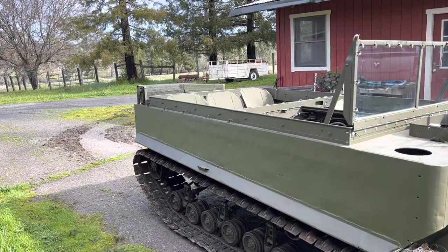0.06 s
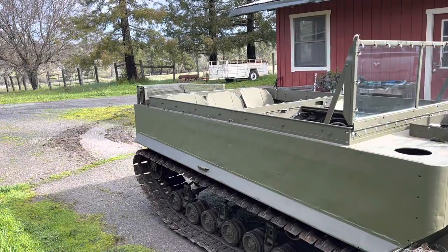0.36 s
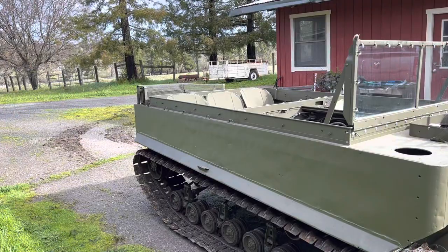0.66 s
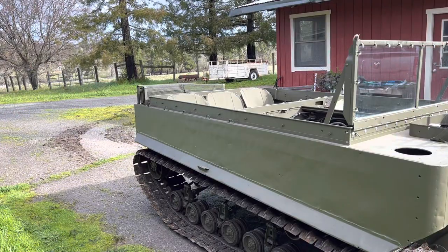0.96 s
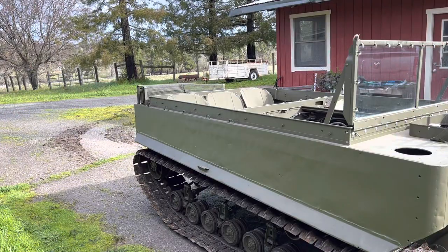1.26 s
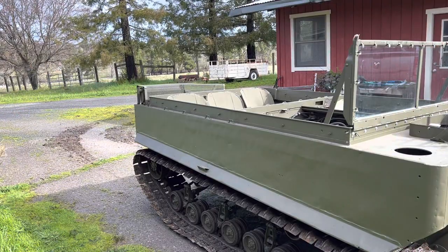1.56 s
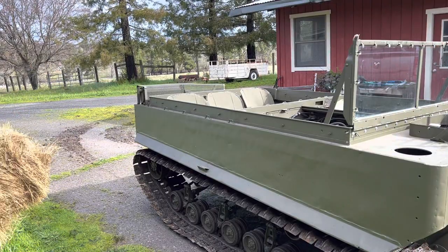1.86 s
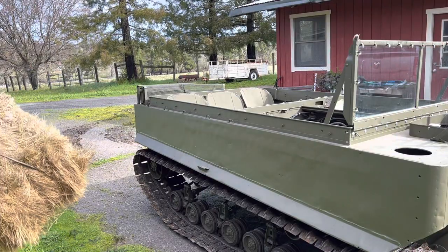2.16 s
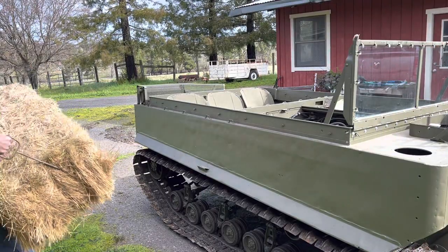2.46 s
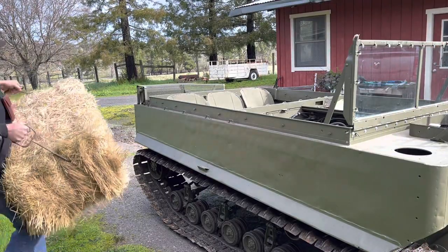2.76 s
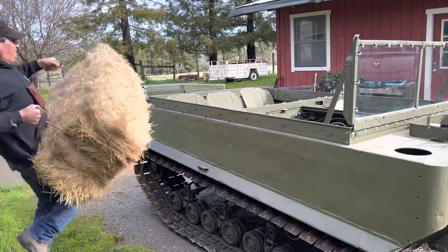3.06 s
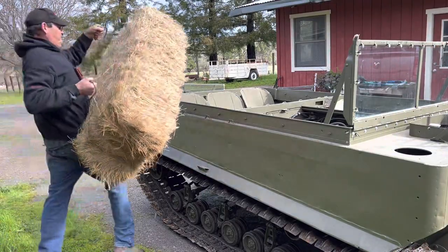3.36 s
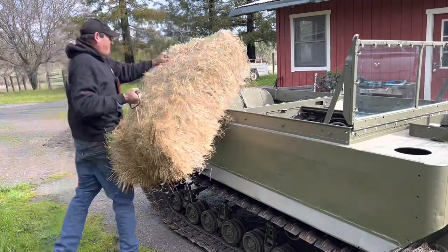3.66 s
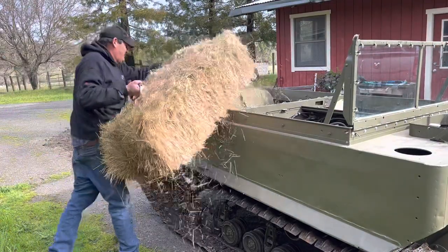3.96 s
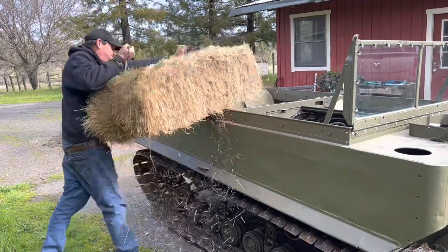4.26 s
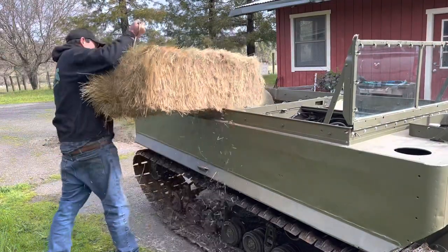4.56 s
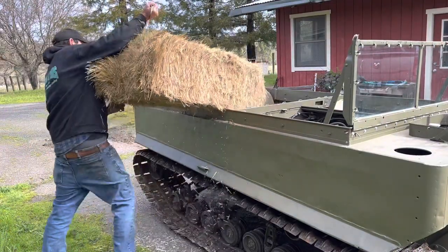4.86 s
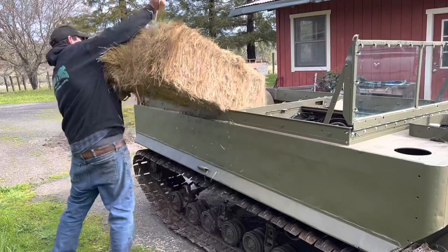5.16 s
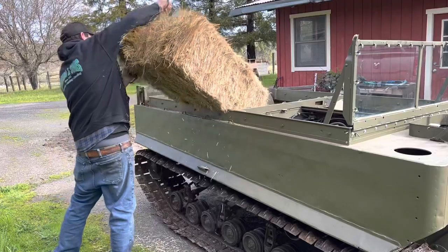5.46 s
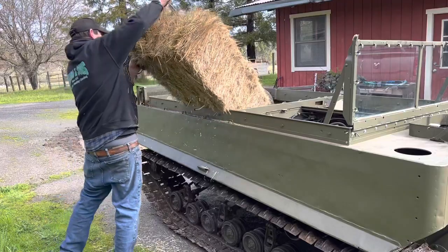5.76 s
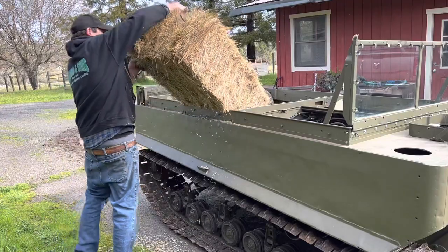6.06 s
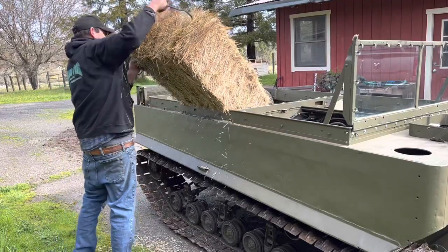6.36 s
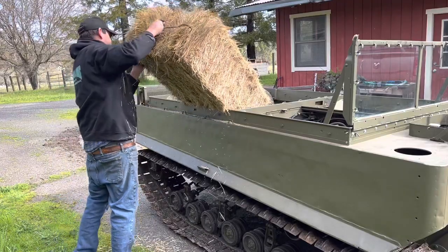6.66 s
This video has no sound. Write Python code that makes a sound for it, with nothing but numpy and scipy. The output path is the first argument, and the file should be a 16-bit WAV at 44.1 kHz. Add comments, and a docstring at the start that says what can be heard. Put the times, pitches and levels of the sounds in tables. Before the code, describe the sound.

A low, lumpy engine idle runs throughout, with a whirring fan and irregular knocks, each followed by an exhaust boom. Over it a hook clinks once and dry hay hisses and crackles in heaves, with a few heavy footfalls. The bale then hits the vehicle's steel side with a hollow thud, scrapes along it and goes on stirring softly. The microphone is a few metres off in an open yard.

```python
"""A farmyard, a phone microphone a few metres from a parked tracked carrier that idles lumpily.
From the start the engine races, stumbles and slows; each hard firing knocks, then booms out of the pipe.
Almost at once a steel hook clinks and a hay bale is picked up; it rustles, stalks snap and boots thump.
About three and a half seconds in, the bale bumps the steel hull and scrapes as it is shoved over
the side. The hay stirs on to the end over the hunting engine."""
import sys
import numpy as np
from scipy import signal
from scipy.fft import rfft, irfft
from scipy.io import wavfile
from scipy.ndimage import uniform_filter1d

SR = 44100
rng = np.random.default_rng(int(sys.argv[2]) if len(sys.argv) > 2 else 0)


def output_pcm(signal):
    """Save a mono or channel-first signal as 16-bit PCM at the path in sys.argv[1].

    Samples are clipped to [-1, 1] before scaling.
    """
    pcm = np.clip(np.atleast_2d(signal).T, -1, 1) * 32767
    wavfile.write(sys.argv[1], SR, np.round(pcm).astype(np.int16))


N = 305613
T = np.arange(N) / SR
FREQS = np.fft.rfftfreq(N, 1 / SR)
TAP_AGE = T[:8192]
TAP_FREQS = np.fft.rfftfreq(len(TAP_AGE), 1 / SR)

# The hunting idle. Each row: time in seconds, nominal firings a second, relative exhaust level in dB.
HUNTING_IDLE = [(0, 37, -36), (0.3, 32.84, -30.5), (0.45, 37.69, -32.5), (0.76, 35.55, -33.5),
                (0.88, 33.3, -28.5), (1.0, 31.9, -32.5), (1.12, 34.77, -26.5), (1.29, 39.06, -35),
                (1.4, 34.28, -38), (1.57, 36.57, -30), (1.72, 38.2, -33), (1.95, 37.2, -36),
                (2.07, 35.95, -28.5), (2.18, 32.2, -34), (2.36, 35.74, -26.5), (2.55, 38.06, -34.5),
                (2.87, 35.8, -31.5), (3.1, 38.3, -34.5), (3.38, 37.2, -33), (3.55, 37.6, -33.5),
                (3.95, 36.93, -30), (4.22, 39.2, -37.5), (4.42, 36.75, -29), (4.55, 38.27, -36),
                (4.95, 35.22, -28.5), (5.17, 38.95, -33.5), (5.4, 36.1, -30), (5.52, 37, -30.5),
                (5.63, 40.1, -33.5), (5.85, 36.1, -30.5), (6.0, 38.17, -36.5), (6.24, 36.74, -29.5),
                (6.38, 38.56, -35), (6.55, 35, -29.5), (6.93, 36, -32)]
# Hard firings, each a stumble of the engine. Each row: time in seconds, relative knock and ring levels
# in dB, ring pitch in Hz, relative crack level in dB.
HARD_FIRINGS = [(0.145, -37, -41, 3180, -59), (0.2563, -35.5, -46, 3300, -52),
                (0.66, -36.5, -40, 3270, -47), (0.795, -42, -40, 3000, -45),
                (0.9208, -44.5, -45.5, 2890, -61), (1.3435, -43, -39.5, 3170, -50),
                (1.7558, -36.5, -44.5, 3160, -57), (1.97, -40.5, -44, 2860, -47),
                (2.0533, -39, -49, 2790, -49), (2.615, -37, -44, 3230, -45), (2.671, -42, -48, 3280, -52),
                (2.7564, -41, -42, 2950, -46.5), (3.163, -38.5, -47.5, 3230, -63),
                (3.245, -44, -42.5, 3250, -59), (3.488, -55, -42, 3180, -57), (3.6263, -43, -51, 2840, -61),
                (3.765, -52, -46, 2730, -49.5), (3.906, -42.5, -49, 2800, -57),
                (4.2796, -42, -45, 2800, -50), (4.575, -43.5, -52, 3350, -54), (4.792, -45, -49, 3000, -55),
                (4.872, -41, -52, 3220, -61), (5.2849, -42, -42, 2900, -47), (5.363, -42, -47, 2800, -51),
                (5.6682, -43, -45, 3290, -47), (5.7779, -40.5, -52, 2820, -49),
                (6.019, -44, -47.5, 2580, -50), (6.0767, -44.5, -48, 2850, -49),
                (6.433, -42, -44, 3120, -50), (6.5404, -44, -46.5, 2880, -48),
                (6.6816, -46, -40.5, 2870, -49), (6.9082, -47, -41.5, 3190, -50)]


def undb(db):
    """Decibels to gain."""
    return 10 ** (np.asarray(db) / 20)


def unit(x):
    """Scale to rms 1."""
    return x / np.sqrt(np.mean(x ** 2))


def curve(rows):
    """Points in time joined into a value at every sample."""
    return np.interp(T, *np.transpose(rows))


def spectrum(rows):
    """Points joined on a log-frequency axis."""
    hz, value = np.transpose(rows)
    return np.interp(np.log(FREQS + 1), np.log(hz), value)


def band(hz, width_hz, freqs=FREQS):
    """Response of one resonance, gain 1 at its centre."""
    return 1j * freqs * width_hz / (hz ** 2 - freqs ** 2 + 1j * freqs * width_hz)


def modes(rows, freqs=FREQS):
    """Response of a body with several resonances."""
    return sum(undb(db) * band(hz, width, freqs) for hz, width, db in rows)


def shape(x, response):
    """Filter by a frequency response."""
    return irfft(rfft(x) * response, N)


def noise():
    """White noise."""
    return rng.standard_normal(N)


def walk(rate, spread=2.9):
    """A random wander about zero that turns `rate` times a second."""
    knots = rng.standard_normal(2048)
    return spread * np.interp(T * rate, np.arange(len(knots)), knots)


def swell(delay_s, spread_s):
    """A smooth hump at the same delay from every hard firing."""
    marks = np.zeros(N + SR)
    marks[[int((row[0] + delay_s) * SR) for row in HARD_FIRINGS]] = 1
    lag = np.arange(-(SR // 2), SR // 2 + 1) / SR
    return signal.fftconvolve(marks, np.exp(-.5 * (lag / spread_s) ** 2), "same")[:N]


def bursts(times, sizes, decay_s):
    """Envelope of sudden starts that die away."""
    out = np.zeros(N)
    for s, size in zip(times, sizes):
        start = int(s * SR)
        age = T[:min(N - start, int(10 * decay_s * SR))]
        out[start:start + len(age)] += size * np.exp(-age / decay_s)
    return out


def strokes(rows, attack_s=0.053, release_s=0.03):
    """Envelope of rubbing movements: each rises towards its level and dies away after its length."""
    out = np.zeros(N)
    for s, length, db in rows:
        start = int(s * SR)
        age = T[:min(SR, N - start)]
        rise = np.minimum(age / attack_s, 1)
        fall = np.exp(-np.maximum(age - length, 0) / release_s)
        out[start:start + len(age)] += undb(db) * rise * fall
    return out


def tap(s, db, decay_s, response, rise_s):
    """One short, rough contact, coloured by what it strikes."""
    force = np.exp(-abs(TAP_AGE - rise_s) / decay_s) * np.minimum(TAP_AGE / rise_s, 1)
    sound = irfft(rfft(force * rng.standard_normal(len(force))) * response)
    out, start = np.zeros(N + SR), max(0, int(s * SR))
    out[start:start + len(force)] = undb(db) * unit(sound) * np.sqrt(np.mean(force ** 2))
    return out[:N]


def ring(rows, at_s, rise_s):
    """A struck body: every mode starts at the blow and dies away."""
    age = np.maximum(T - at_s, 0)
    ringing = sum(undb(db - 60 * age / t60) * np.sin(2 * np.pi * hz * age) for hz, t60, db in rows)
    return -np.expm1(-age / rise_s) * ringing


def crank():
    """Firings counted since the start, nudged so that every hard firing falls on a beat."""
    count = np.cumsum(curve(np.array(HUNTING_IDLE)[:, :2])) / SR
    times = np.array(HARD_FIRINGS)[:, 0]
    at_hard = np.interp(times, T, count)
    beats = np.cumsum(np.maximum(1, np.round(np.diff(at_hard, prepend=0))))
    return count + np.interp(T, times, beats - at_hard)


def overtones(beat, drift, drift_rate):
    """The 7th to 12th multiples of the firing rate, each drifting in phase."""
    return sum(np.cos(2 * np.pi * order * beat + drift * walk(drift_rate)) for order in range(7, 13))


def exhaust(beat, gas_db=-26, trim_db=-2, wobble=.22, roughness=.34):
    """The pipe favours twice the firing rate; its note falters at each stumble and gas puffs each beat."""
    # The pipe's tone. Each row: multiple of the firing rate, relative level in dB.
    harmonics = [(1, -20), (2, 7), (3, -11.5), (4, -14), (5, -34), (6, -22.5), (7, -31.5), (8, -28.5),
                 (9, -37), (10, -28.5), (11, -43.5), (12, -30.5), (14, -37)]
    # In a stumble the note falters, drops out again, kicks, then sags slightly.
    # Each row: delay from the knock in seconds, spread in seconds, level change in dB.
    stumble = [(-.006, 0.0033, -9.5), (0.056, 0.027, -6.5), (0.092, 0.0064, 5), (.16, 0.073, -1)]
    # Lone firings that drop out or kick. Each row: time in seconds, level change in dB.
    lurches = [(.59, -8), (.835, 4), (0.989, -9), (1.262, -8), (1.325, -9), (1.41, 21), (1.464, -6),
               (1.735, -11), (1.84, -5), (2.27, 6), (2.42, -9), (2.498, -19), (3.122, -6), (4.24, -7),
               (4.326, 10.5), (4.365, -9), (4.47, 2), (4.665, 4), (4.704, -11), (5.19, -11), (5.98, -2.5),
               (6.402, -9), (6.535, 7), (6.76, -2)]
    stumble_db = sum(db * swell(delay, spread) for delay, spread, db in stumble)
    lurch_db = sum(db * np.exp(-.5 * ((T - s) / .015) ** 2) for s, db in lurches)
    flow = undb(curve(np.array(HUNTING_IDLE)[:, ::2]) + trim_db)
    strength = undb(stumble_db + lurch_db + walk(36))
    # no two firings push the crank equally hard
    unrest = np.clip(swell(delay_s=.04, spread_s=.06), .35, 1)
    jolt = wobble * unrest * walk(36)
    tone = 0
    for order, db in harmonics:
        # away from the pipe's resonance every firing differs, most of all in a stumble
        scatter = 0 if order == 2 else roughness * unrest
        size = undb(db) * (1 + scatter * walk(22))
        tone = tone + size * np.cos(2 * np.pi * order * beat + jolt + scatter * walk(14))
    puffs = 1 + 0.075 * np.cos(2 * np.pi * (beat - .8))
    gas = puffs * unit(shape(noise(), band(hz=204, width_hz=450) ** 2))
    return flow * (np.sqrt(2) * strength * tone + undb(gas_db) * gas)


def growl(beat, breath_db=-7, lumpiness=1.1, puff_depth=.7):
    """Uneven firings drive the silencer's throat: overtones glide through it and gas puffs each beat."""
    # The throat's resonances. Each row: centre in Hz, width in Hz, relative gain in dB.
    throat_modes = [(302.3, 42, 2.5), (383, 40, -2.5)]
    # The growl's course. Each row: time in seconds, level in dB.
    levels = [(0, -47), (1.3, -49.5), (2.4, -49), (3.0, -49.5), (3.4, -60.5), (6.93, -49.5)]
    drive = overtones(beat, drift=.6, drift_rate=12)
    gas = noise() * (1 + puff_depth * np.cos(2 * np.pi * beat))
    throat = modes(throat_modes)
    voice = unit(shape(drive, throat)) + undb(breath_db) * unit(shape(gas, throat ** 2))
    return undb(curve(levels)) * unit(voice * undb(lumpiness * walk(30)))


def machinery(beat, whirr_db=-39.5, throb=0.025, flicker=0.56, cover_db=-53, shake_db=-7):
    """Fan and valve gear whirr in step with the crank; the cover hums as overtones glide through it."""
    # The colour of fan and valve gear. Each row: frequency in Hz, relative density in dB.
    whirr_colour = [(30, -11), (50, 3), (110, 9), (145, 1), (220, 0), (300, -7), (345, -11), (450, -6.5),
                    (700, -12.5), (1300, -17.5), (2100, -21), (3100, -24), (3900, -34.5), (5500, -40.5),
                    (15000, -45)]
    # The engine cover's resonances. Each row: centre in Hz, width in Hz, relative gain in dB.
    cover_modes = [(306.6, 19, -3.5), (371, 19.4, 0), (803, 10, -6.5), (1042, 40, -7), (2766, 26, -13.5)]
    pulse = (1 + throb * np.cos(2 * np.pi * beat)) * undb(flicker * walk(22))
    whirr = unit(shape(noise() * pulse, undb(spectrum(whirr_colour))))
    shaking = overtones(beat, drift=.5, drift_rate=10)
    cover = modes(cover_modes)
    hum = unit(shape(noise(), cover)) + undb(shake_db) * unit(shape(shaking, cover))
    return undb(whirr_db) * whirr + undb(cover_db) * hum


def knocks(ring_trim_db=-0.5, ring_width_hz=500, rap_s=.0032, tail_s=0.057):
    """Each knock raps the engine block and rings briefly at its own pitch."""
    # The block's resonances. Each row: centre in Hz, width in Hz, relative gain in dB.
    block_modes = [(1114, 77, 13.5), (1410, 130, 7.5), (1630, 160, 5), (2260, 850, -10.5), (3650, 300, -23)]
    # Further engine knocks, without the bright crack.
    # Each row: time in seconds, relative knock and ring levels in dB, ring pitch in Hz.
    further_knocks = [(0.003, -38.5, -39, 3200), (0.823, -46, -46, 3230), (0.855, -44, -49, 2840),
                      (1.374, -39.5, -45, 2820), (1.996, -47, -45.5, 3370), (2.083, -42, -45, 2860),
                      (2.134, -49, -49, 3330)]
    # The rap, the next firing's softer rap and the hull's short tail.
    # Each row: delay in seconds, relative level in dB, decay in seconds.
    contacts = [(-.0015, 0, rap_s), (.027, -12, rap_s), (0, -17, tail_s)]
    block, out = modes(block_modes, TAP_FREQS), np.zeros(N)
    for s, knock_db, ring_db, hz in [row[:4] for row in HARD_FIRINGS] + further_knocks:
        ringing = band(hz, ring_width_hz, TAP_FREQS) ** 2
        for db, response in (knock_db, block), (ring_db + ring_trim_db, ringing):
            for delay_s, share_db, decay_s in contacts:
                out += tap(s + delay_s, db + share_db, decay_s, response, rise_s=.002)
    return out


def booms(delay_s=0.02604, boom_db=-22, boom_hz=68, spread_s=.0075):
    """The exhaust valve opens just after a hard firing and lets out one heavy swing of pressure."""
    # Further exhaust booms. Each row: time in seconds, level in dB, pitch in Hz.
    further_booms = [(0.026, -18, 63), (0.3668, -20, 72), (0.5556, -16, 71), (0.643, -17.5, 83),
                     (0.88, -35, 67.4), (2.0195, -19.5, 70.5), (2.139, -20, 60.6)]
    out = np.zeros(N)
    for s, db, hz in [(row[0] + delay_s, boom_db, boom_hz) for row in HARD_FIRINGS] + further_booms:
        near = abs(T - s) < 5 * spread_s
        age = T[near] - s
        out[near] += undb(db) * np.sin(2 * np.pi * hz * age) * np.exp(-.5 * (age / spread_s) ** 2)
    return out


def hay(trim_db=2, grain_db=4, unevenness=.65, crackle_db=-5, stalks_per_s=550, split_hz=7800):
    """Countless stalks rub into a hiss that swells with each heave; single ones crackle through it."""
    # The colour of hay. Each row: frequency in Hz, relative density in dB.
    straw_colour = [(500, -10), (2000, -2), (4000, -2), (5600, -2.5), (8000, 4.5), (10000, 5.5),
                    (12000, 1.5), (14000, 0.5), (16000, 0)]
    # Heaves of the bale. Each row: start and length in seconds, relative level in dB, treble tilt in dB.
    heaves = [(0.05, 0.044, -48, -13), (0.486, 0.17, -56.5, -1), (0.973, 0.096, -49, 3),
              (1.104, 0.26, -53, 0), (1.557, 0.24, -47, 0.5), (1.983, 0.23, -60.5, 1),
              (2.182, 0.16, -57, -5), (2.776, 0.091, -51.5, -7), (3.327, 0.14, -53.5, -6),
              (3.506, 0.13, -56, 1), (3.942, 0.34, -61, -3), (4.718, 0.51, -59.5, 1), (6.442, 0.17, -56, 2)]
    # Hay stirring between the heaves. Each row: time in seconds, relative level in dB.
    stirring = [(0, -69), (.9, -65.5), (1.45, -57), (1.95, -64), (2.6, -68), (3.1, -66.5), (3.7, -60),
                (4.5, -63.5), (5.5, -64), (5.88, -67), (6.3, -60.5), (6.93, -61)]
    rub = noise() * undb(grain_db * noise())
    stalks = (rng.random(N) < stalks_per_s / SR) * noise()
    stalks *= undb(4 * np.minimum(rng.exponential(size=N), 4))  # a few stand out, by up to 16 dB
    friction = unit(rub) + undb(crackle_db) * unit(stalks)
    hiss = unit(shape(friction, undb(spectrum(straw_colour))))
    rasp = shape(hiss, 1 / (1 + (FREQS / split_hz) ** 4))
    out = 0
    for part, lean in (rasp, -.5), (hiss - rasp, .5):
        effort = strokes([(s, length, db + lean * tilt_db) for s, length, db, tilt_db in heaves])
        out = out + part * np.hypot(effort, undb(curve(stirring)))
    return out * undb(trim_db + unevenness * walk(29))


def hook(at_s=0.0962, drag_s=.032, clink_gain_db=2.5):
    """The steel hook drags with a swelling scrape and clinks once as the bale is picked up."""
    # The hook's modes. Each row: pitch in Hz, seconds to fall 60 dB, relative level in dB.
    hook_modes = [(1900, 0.018, -44), (1980, 0.047, -38), (2220, 0.11, -43.5), (2460, 0.042, -41),
                  (2920, 0.026, -40), (5090, 0.027, -39.5), (5730, .05, -53), (6160, 0.054, -56),
                  (6960, .07, -56)]
    scrape = unit(shape(noise(), band(hz=2300, width_hz=2200) ** 2))
    drag = strokes([(at_s - drag_s, drag_s, -47.5)]) * scrape
    return drag + undb(clink_gain_db) * ring(hook_modes, at_s, rise_s=.0004)


def snaps(trim_db=-2, breadth=.95):
    """Dry stalks break with a short bright tick; the first tick is the steel hook snapping against the bale."""
    # Short ticks: first the hook's snap as it bites the bale, then breaking stalks. Each row: start in seconds,
    # relative level in dB, pitch in Hz, decay in seconds.
    ticks = [(0.097, -36, 8800, 0.0028), (0.4013, -45, 13000, 0.00055), (0.736, -48, 12770, .001),
             (.805, -39.5, 7300, 0.0017), (1.453, -37, 3140, 0.0013), (1.458, -34, 3040, 0.001),
             (1.883, -53, 5500, .001), (3.277, -47, 10100, 0.0023), (3.999, -42, 7500, 0.0024),
             (4.157, -44, 5940, 0.0024), (6.555, -39, 12000, 0.0023)]
    return sum(tap(s, db + trim_db, decay_s, band(hz, breadth * hz, TAP_FREQS) ** 2, rise_s=.0002)
               for s, db, hz, decay_s in ticks)


def cracks():
    """The crisp metallic edge of each hard firing's knock."""
    times, *_, db = np.transpose(HARD_FIRINGS)
    force = uniform_filter1d(bursts(times, undb(db), decay_s=.0045), size=200)
    return force * unit(shape(noise(), band(hz=8200, width_hz=5500) ** 2))


def thumps(breadth=0.53):
    """Boots and bale land softly and heavily, each a dull burst of low noise."""
    # The landings. Each row: time in seconds, relative level in dB, decay in seconds, pitch in Hz.
    landings = [(0.574, -27.5, 0.054, 138), (.86, -28, 0.084, 110), (1.08, -25, 0.034, 111),
                (1.383, -28, 0.022, 131), (2.33, -32, 0.03, 130.4)]
    out = np.zeros(N)
    for s, db, decay_s, hz in landings:
        push = uniform_filter1d(bursts([s], [undb(db)], decay_s), size=1600)
        out += push * unit(shape(noise(), band(hz, breadth * hz) ** 2))
    return out


def scrapes():
    """The bale catches on the hull as it slides."""
    # The slides. Each row: start in seconds, length in seconds, level in dB.
    slides = [(3.45, 0.11, -52.5), (3.525, 0.11, -48), (4.05, 0.33, -58.5)]
    friction = noise() * undb(walk(140))
    return strokes(slides) * unit(shape(friction, band(hz=1050, width_hz=2000) ** 2))


def bumps():
    """The bale lands against the steel side and the hull booms."""
    # The hull's modes. Each row: pitch in Hz, seconds to fall 60 dB, relative level in dB.
    hull_modes = [(72, 0.15, -25), (136, 0.17, -41), (195.4, 0.19, -26), (260, .1, -39)]
    # The bale's blows. Each row: time in seconds, gain in dB.
    blows = [(3.566, 2.5), (3.643, -16)]
    return sum(undb(db) * ring(hull_modes, s, rise_s=0.004) for s, db in blows)


def microphone_ports(direct, wide):
    """Two ports hear the direct sound out of step; a second signal, opposite in each, widens it."""
    # Phase between the ports. Each row: frequency in Hz, the left's lead in radians.
    phase = [(0, 0), (1000, -.6), (2000, -.6), (3300, 1.1), (5500, .2), (7400, -.1), (8600, -1.4),
             (9500, -3), (10800, -3.3), (12600, -6.2), (14300, -6.4), (16000, -9)]
    # Balance between the ports. Each row: frequency in Hz, left minus right in dB.
    balance = [(60, 1.2), (300, 1), (800, -.3), (2000, 1.5), (4000, 3), (8000, .2), (15000, 0)]
    # Stereo width, with a narrow gap near 10 kHz. Each row: frequency in Hz, gain in dB.
    stereo_width = [(60, -8.5), (150, -18), (300, -12), (700, -6.5), (1400, -5.5), (2600, -10),
                    (5000, -1.5), (7000, -6.5), (10000, -78), (14000, -9)]
    sides = np.array([[1], [-1]])
    lead = np.exp(.5j * sides * np.interp(FREQS, *np.transpose(phase)))
    pair = direct + sides * shape(wide, undb(spectrum(stereo_width)))
    return shape(pair, lead * undb(sides * spectrum(balance) / 2))


def scene():
    """The idling engine and the bale in the open yard, a few metres off."""
    beat = crank()
    engine = exhaust(beat) + growl(beat) + booms() + knocks() + cracks() + machinery(beat)
    bale = hay() + snaps() + hook() + scrapes() + bumps() + thumps()
    wide = machinery(beat) + knocks() + cracks() + hay()
    return microphone_ports(engine + bale, wide)


def record(dry, bass_hz=31, top_hz=15800):
    """The phone sheds the deepest bass and cuts the top."""
    low_cut = signal.butter(3, bass_hz, "highpass", fs=SR, output="sos")
    high_cut = signal.ellip(10, .1, 80, top_hz, fs=SR, output="sos")
    return signal.sosfilt(high_cut, signal.sosfiltfilt(low_cut, dry, padtype="even"))


dry = scene()
out = record(dry)
output_pcm(out)
```